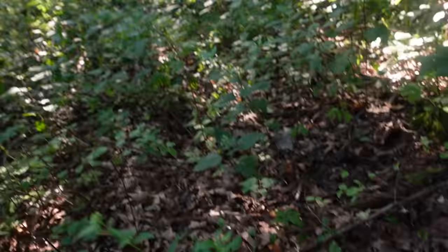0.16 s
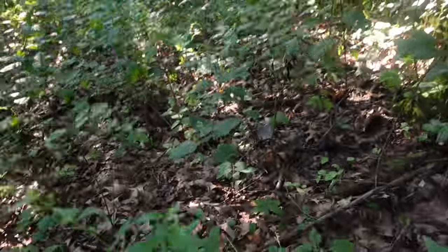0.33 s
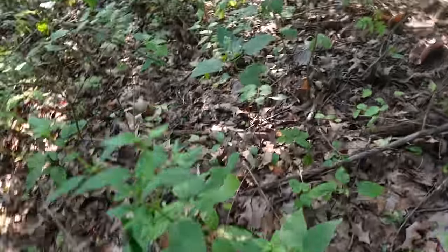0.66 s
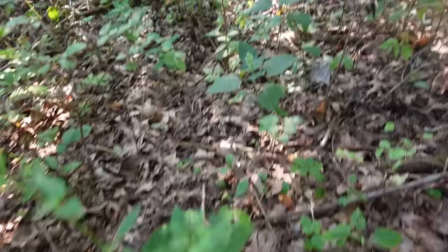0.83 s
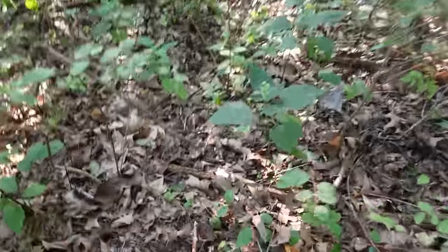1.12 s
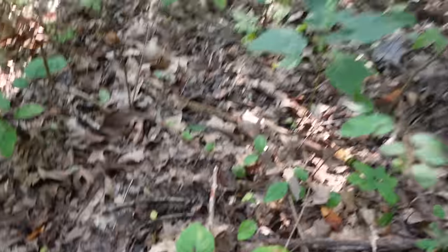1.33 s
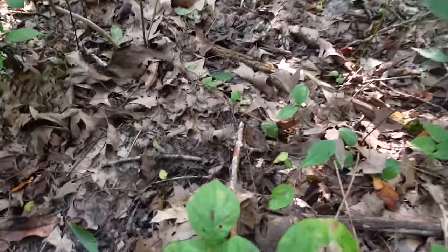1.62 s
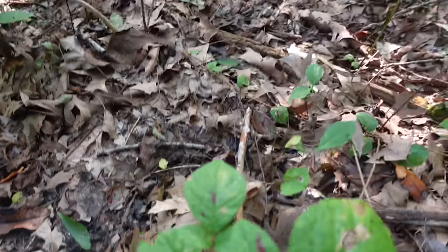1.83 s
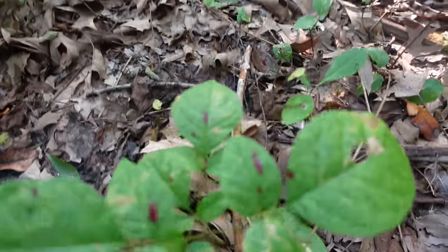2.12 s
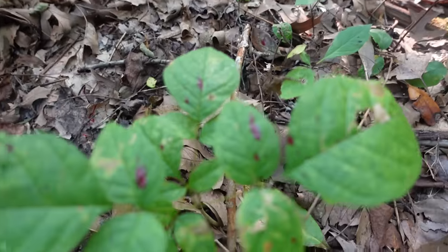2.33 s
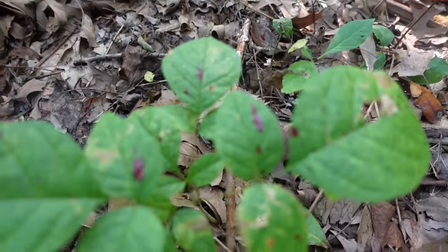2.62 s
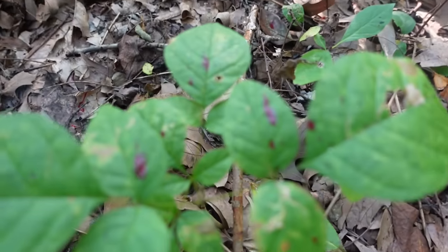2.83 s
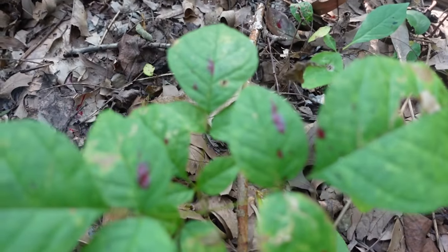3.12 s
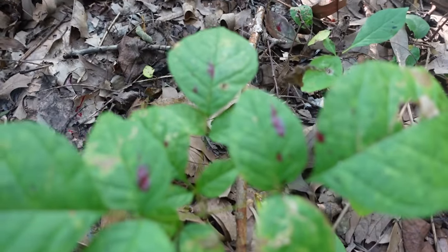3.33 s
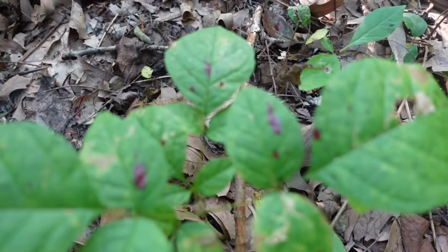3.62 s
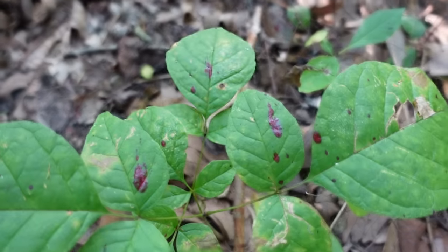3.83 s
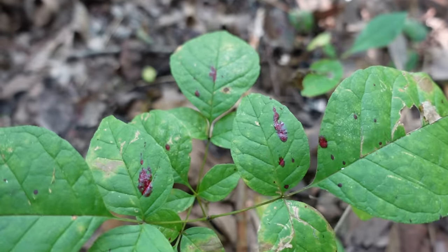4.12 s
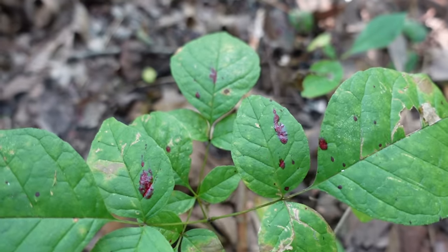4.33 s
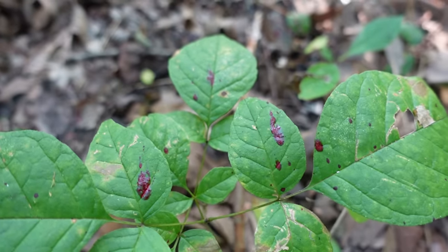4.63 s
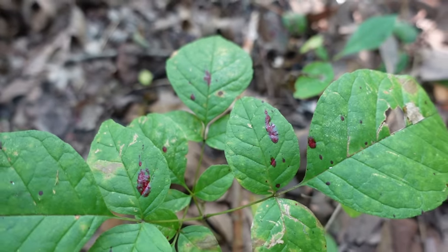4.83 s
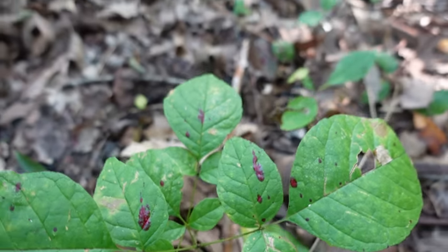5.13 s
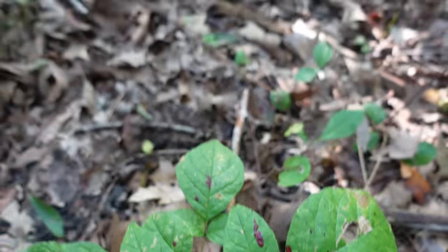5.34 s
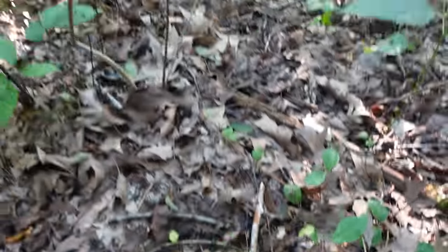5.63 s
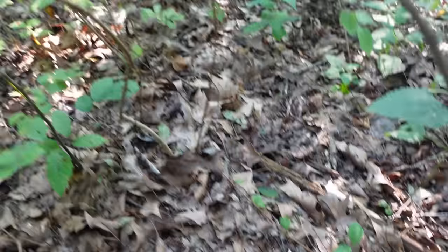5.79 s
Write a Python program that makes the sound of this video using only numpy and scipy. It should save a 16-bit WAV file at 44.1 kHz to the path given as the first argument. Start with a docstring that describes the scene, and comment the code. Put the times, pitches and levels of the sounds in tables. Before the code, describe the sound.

Distant cicadas fill summer woods with a steady, high drone for all six seconds, over a faint hiss of air. A nearby cricket adds a fast, thin, very high trill. From the start, feet stir dry leaves, with a twig snap just after the opening, while fingers make small plastic clicks, dull bumps and short low hums on the hand-held camera, slightly left. Between about 1.1 and 1.6 seconds a step crunches the litter and several twigs crack sharply, the loudest moment. Handling clicks and smaller snaps thin out by 3 seconds. Around 2.8 seconds the lens motor whines for a quarter of a second, left of centre. From 3 to 5 seconds the insects are nearly alone. Then come a few light clicks and very faint, low pips, and at about 5.8 seconds a soft swish of green leaves with a dry rustle underfoot.

```python
"""Far choirs of cicadas fill summer woods, their countless tymbal pulses blurring into two droning bands.
One cricket trills close by, a tone for each wing stroke. Feet shift in dry leaves and snap twigs.
Fingers make the plastic shell of a small hand-held camera click and hum; its lens motor whines once.
Near the end come a few soft pips and a swish of green leaves, all over a thin bed of air."""
import sys
import numpy as np
from scipy import signal
from scipy.fft import rfft, irfft, next_fast_len
from scipy.io import wavfile
from scipy.ndimage import uniform_filter1d, map_coordinates

SR = 44100
rng = np.random.default_rng(int(sys.argv[2]) if len(sys.argv) > 2 else 0)


def log_audio(samples):
    """Write samples as a 16-bit WAV file to the path given in sys.argv[1]."""
    # one column per channel
    frames = np.atleast_2d(samples).T
    # limit to full scale, then quantise
    limited = np.clip(frames, -1, 1)
    pcm = np.round(limited * 32767).astype(np.int16)
    wavfile.write(sys.argv[1], SR, pcm)


N = 262836

# Cicada faders, panned as the camera turns: (time [s], low choir [dB], high choir [dB], pan [dB])
CHOIR_FADERS = [(0, -44.5, -40, -1), (.8, -45.5, -40.5, -0.42), (1.3, -45, -41.5, -.8),
                (2, -45, -42.5, -0.04), (3.2, -45, -41.5, -.5), (4.3, -45.5, -42, -1),
                (5.2, -44.5, -42, -2), (5.96, -44, -41.5, -2.5)]
# Colour of each choir: (frequency [Hz], relative level [dB])
LOW_CHOIR_EQ = [(1060, -51), (1800, -27), (1950, -73.5), (2100, -24.5), (2380, -9.5), (2780, -5),
                (3430, -2.5), (3960, 1.5), (4270, 0), (4900, -7), (6370, -25), (10800, -120)]
HIGH_CHOIR_EQ = [(4100, -34), (4600, -10), (5400, -4), (6200, -0.5), (6900, 1), (7300, -3), (7800, -10),
                 (8500, -18.5), (9500, -29.5), (10500, -32.5)]
# Stereo image of choirs and air: (frequency [Hz], left-right likeness [-1..1])
WOODS_LIKENESS = [(60, 1), (130, 0.44), (290, -0.066), (640, -0.4), (1410, 0.063), (3100, 0.637),
                  (6820, 0.54), (15000, 0.42)]
# The cricket's wing tone: (time [s], level [dB])
TRILL_FADER = [(0, -55), (1, -47.5), (2, -49), (3, -49.5), (4, -50), (5, -53.5), (5.5, -48), (5.96, -45)]

# Leaf litter stirring: (time [s], rustle [dB], crackle [dB])
LITTER_FADERS = [(0, -62.5, -52), (.25, -60.5, -56), (.45, -54, -53.5), (.95, -55.5, -54.5),
                 (1.5, -52.5, -55.5), (1.85, -60.5, -56.5), (2.5, -64.5, -63.5), (3.6, -67, -70),
                 (4.5, -83.5, -74), (5.2, -73, -65), (5.42, -60.5, -56.5), (5.65, -71, -62.5),
                 (5.78, -66, -62), (5.96, -63, -69)]
# A shoe crushes the litter: (peak time [s], rustle [dB], crackle [dB], 20 dB fade [s])
SCUFFS = [(1.09, -51.5, -59, 0.2331), (1.245, -52, -57, .06), (1.29, -35.5, -45, 0.0769),
          (1.392, -40, -45.5, .07), (1.436, -39, -51, 0.0045), (1.489, -49, -49, 0.05),
          (1.58, -60, -58, 0.1062), (1.685, -54.5, -64, 0.24), (2.09, -64, -57.5, -0.01),
          (5.8, -50, -54, .04), (5.835, -45, -49, .05), (5.857, -48, -52, .03), (5.915, -57, -69, 0.24)]
# Colours of dry rustle, dry crackle and green leaves: (frequency [Hz], relative level [dB])
RUSTLE_EQ = [(100, -41.5), (200, -2.5), (500, -3.5), (1000, -1), (2000, 1.5), (4000, 2), (7000, -30)]
CRACKLE_EQ = [(3000, -45), (6000, 6), (9000, 2), (12000, -9.5), (14300, -10), (15700, -25), (16200, -34)]
SWISH_EQ = [(130, -28), (300, -5), (700, -6.5), (1600, -1), (3000, 4), (6000, -30.5), (11000, -19.5),
            (15600, -27.5)]
# Twigs and stiff leaves breaking: (time [s], body peak [dB], centre [Hz], treble peak [dB])
SNAPS = [(.130, -25.5, 3080, -53.5), (1.072, -41, 3800, -45), (1.098, -25, 3740, -56.5),
         (1.287, -18.5, 860, -44), (1.2887, -10, 4870, -38), (1.291, -18.5, 2940, -32.5),
         (1.306, -14.5, 4100, -36), (1.306, -14, 2280, -32.5), (1.308, -27, 820, -50),
         (1.394, -23, 3070, -35), (1.412, -27.5, 4200, -48), (1.4267, -14, 3250, -52),
         (1.432, -28, 3160, -52), (1.452, -42.5, 4000, -41), (1.47, -27.5, 3100, -39),
         (1.515, -50, 3800, -50), (1.524, -48, 3598, -51), (1.557, -28.5, 3000, -44.5),
         (1.569, -28.5, 3600, -49), (1.907, -34, 9000, -62), (2.1, -38, 3800, -50),
         (2.146, -24.5, 2630, -60), (2.272, -34, 2610, -53), (2.920, -23.5, 2305, -56)]
# Thin twigs die sooner: (centre [Hz], 60 dB decay [s])
SNAP_DECAY = [(800, 0.018), (2500, 0.011), (4500, 0.01)]

# Fingers slipping on the shell: (time [s], peak [dB], centre [Hz])
CLICKS = [(0.038, -50, 907), (0.131, -45, 1100), (.172, -39.5, 577), (.215, -43, 508), (.224, -51, 581),
          (.233, -39.5, 497), (.242, -46, 690), (.342, -40.5, 608), (.355, -42.5, 595), (0.398, -41.5, 810),
          (.486, -47, 1650), (.513, -43, 700), (.549, -43, 1630), (.558, -46, 600), (.577, -46, 600),
          (.603, -46, 810), (.672, -45, 800), (0.898, -48.5, 1270), (.986, -44, 800), (1.008, -37.5, 1094),
          (1.046, -49, 805), (1.139, -41, 808), (1.242, -33, 1430), (1.386, -31, 1440), (1.552, -38, 1900),
          (1.568, -43, 650), (1.59, -45.5, 1320), (1.636, -33.5, 1590), (1.668, -32, 1790),
          (1.702, -26, 1700), (1.739, -30, 1740), (1.787, -40, 1770), (1.888, -42.5, 644),
          (1.929, -33, 1470), (1.953, -42, 676), (2.066, -47, 1303), (2.096, -46.5, 1260),
          (2.139, -40.5, 1870), (2.186, -51, 1350), (2.274, -58.5, 1810), (2.437, -41, 2000),
          (2.565, -49, 1626), (2.736, -48, 1670), (2.756, -40.5, 1850), (2.906, -40.5, 2200),
          (2.933, -38.5, 1500), (3.465, -41, 1000), (4.543, -56, 1280), (4.733, -59, 1640),
          (5.309, -39, 1250), (5.344, -41.5, 1680), (5.369, -56, 1110), (5.492, -59.5, 600)]
# Dull clicks sit further left: (centre [Hz], pan [dB])
CLICK_PAN = [(600, 8.5), (1700, 2.5)]
# Resonances of the plastic: (frequency [Hz], width [Hz], gain [dB])
SHELL_MODES = [(394, 22.6, -3.5), (608, 90, -3), (860, 143, -11.5), (1187, 215, -0.5), (1778, 250, -11)]
# Squeezes of the hand: (start [s], length [s], hum [dB])
SQUEEZES = [(0.016, 0.072, -51.5), (0.072, 0.0605, -61), (0.127, 0.047, -52), (0.194, 0.0691, -37.5),
            (0.246, 0.092, -50.5), (.33, 0.16, -60.5), (0.515, .12, -60.5), (0.658, 0.058, -58),
            (.735, 0.045, -58), (0.998, 0.13, -62), (1.109, 0.094, -58), (1.23, 0.068, -61),
            (1.309, .07, -47.5), (1.627, 0.12, -48), (1.72, 0.11, -54), (1.863, 0.08, -54),
            (1.938, 0.072, -63), (2.06, 0.153, -72.5)]
# Pushes on the shell: (time [s], level [dB])
BUMPS = [(.027, -49), (.046, -56), (.174, -35), (.209, -35), (0.344, -35.5), (0.399, -45.5), (0.515, -47),
         (0.606, -53), (0.676, -57), (1.013, -54), (1.141, -54), (1.244, -57), (1.286, -30), (1.309, -30),
         (1.639, -40), (1.669, -61), (1.701, -37), (1.739, -38.5), (1.897, -50.5), (1.952, -41),
         (3.468, -62.5)]

# The focus motor's run: (time [s], gear rate [Hz], whine [dB])
MOTOR_RUN = [(2.752, 491, -50), (2.764, 493.6, -41), (2.777, 490, -39), (2.8, 590, -49.5),
             (2.83, 539, -51.5), (2.858, 468, -48), (2.92, 494.3, -46.5), (2.96, 496, -46.5),
             (2.977, 498, -39.5), (2.995, 492, -60)]
# Harmonics of the whine and of the low gear tone: (multiple of gear rate, relative level [dB])
WHINE_HARMONICS = [(7, 2.5), (8, -5)]
GEAR_HARMONICS = [(2, -26), (3, -16), (4, -11.5), (5, -9), (6, -14)]
# Colour of the motor's scrape: (frequency [Hz], relative level [dB])
SCRAPE_EQ = [(90, -22), (125, -11.5), (160, 1), (200, -3), (400, -6), (1500, -9), (3500, -1), (5000, -25.5)]

# Soft low pips: (time [s], pitch [Hz], level [dB], length [s])
PIPS = [(4.982, 745, -69, 0.047), (5.55, 670, -60.5, .018), (5.583, 675, -58, 0.017),
        (5.608, 686, -61.5, 0.025)]
# Colour of the air bed: (frequency [Hz], relative level [dB])
AIR_EQ = [(30, -25.5), (70, 1), (110, -1.5), (300, -1), (800, -1.5), (1500, -5.5), (2100, -4.5), (9000, 0),
          (12600, 1.5), (13800, -6.5), (14450, -4.5), (14650, -50)]


def cicadas(low_trim_db=1.2, high_trim_db=2.5, low_pan_db=-0.75):
    """Two kinds sing; so many tymbals at once merge into bands that swell a little."""
    low_db, high_db, pan = curves(CHOIR_FADERS)
    low = amp(low_db + low_trim_db + 0.17 * wobble(4.1)) * swarm(LOW_CHOIR_EQ, 1.5, 0.78)
    high = amp(high_db + high_trim_db + 0.1 * wobble(4.2)) * swarm(HIGH_CHOIR_EQ, 1.5, 0.57)
    return placed(low, pan + low_pan_db) + placed(high, pan)


def cricket(strokes_per_s=40.5, first_s=.0065, stroke_s=0.016, wing_hz=7190, sag_hz=170):
    """Each wing stroke is a short tone that sags in pitch, with a faint octave, and echoes among trunks."""
    t = np.arange(round(stroke_s * SR)) / SR
    tone, octave = np.zeros(N), np.zeros(N)
    for k in range(int(N / SR * strokes_per_s)):
        late_s, detune_hz, accent_db, start_phase = rng.standard_normal(4) * [.0006, 15.0, 2.6, 8.6]
        phase = start_phase + 2 * np.pi * ((wing_hz + detune_hz) * t - sag_hz * t * t / (2 * stroke_s))
        envelope = amp(accent_db) * np.sin(np.pi * t / stroke_s) ** 2.34
        start = max(first_s + k / strokes_per_s + late_s, 0)
        add(tone, start, envelope * np.sin(phase))
        add(octave, start, envelope ** 1.4 * np.sin(2 * phase))
    direct = amp(curves(TRILL_FADER)[0]) * unit(tone) + amp(-80.5) * unit(octave)
    trunks = rng.standard_normal((2, SR // 5)) * amp(-60 * np.arange(SR // 5) / SR / .15)
    echo = signal.fftconvolve(direct[None], trunks / np.linalg.norm(trunks[0]), axes=1)[:, :N]
    pan = curves(CHOIR_FADERS)[-1] + .3  # moves with the choirs
    return placed(direct + amp(-16) * echo, pan)


def dry_leaves(rise_share=0.54):
    """Leaf litter rustles and crackles in clumps under the feet, surging with each scuff."""
    rustle_gain, crackle_gain = amp(curves(LITTER_FADERS))
    for s, rustle_db, crackle_db, fade_s in SCUFFS:
        rustle_gain += swell(s, rustle_db, rise_share * fade_s, fade_s)
        crackle_gain += swell(s, crackle_db, rise_share * fade_s, fade_s)
    clumps = wobble(30)
    rustle = amp(0.28 * clumps + 0.32 * wobble(90)) * swarm(RUSTLE_EQ, 1.67, 3.0, [(300, 0.475)])
    crackle = amp(1.1 * clumps + 1.4 * wobble(90)) * swarm(CRACKLE_EQ, 1.54, 1.93, [(9000, 0.43)])
    return rustle_gain * unit(rustle) + crackle_gain * unit(crackle)


def twigs():
    """Each break is a sharp crack with a treble splinter that lasts twice as long."""
    out = np.zeros((2, N))
    for s, db, hz, treble_db in SNAPS:
        t60 = along(SNAP_DECAY, hz)
        body = burst(t60, lambda f: mode(f, hz, min(1.1 * hz, 4500)) ** 3, likeness=.75, rise_s=0.00039)
        splinter = burst(2 * t60, lambda f: mode(f, 11500, 6700) ** 3, likeness=0.49, rise_s=0.0014)
        add(out, s, amp(db) * body + amp(treble_db) * splinter)
    return out


def shell_clicks(t60=0.0115):
    """Fingertips slip on the plastic: soft strikers that ring its small modes."""
    def colour(f, hz):
        fingertip = mode(f, hz, 1.57 * hz) ** 2 / (1 + 1j * f / (3.4 * hz)) ** 2
        ring = sum((-1) ** k * amp(db) * mode(f, mode_hz, width)
                   for k, (mode_hz, width, db) in enumerate(SHELL_MODES))
        return fingertip * (0.412 + ring)

    out = np.zeros((2, N))
    for s, db, hz in CLICKS:
        click = burst(t60, lambda f: colour(f, hz), likeness=0.39, rise_s=0.002178)
        add(out, s, amp(db) * placed(click, along(CLICK_PAN, hz)))
    return out


def grip(hum_hz=228, bump_t60=0.074):
    """Squeezes make the shell's lowest mode hum and creak; pushes thump it and a shorter mode above."""
    pressure, t = np.zeros(N), np.arange(SR // 4) / SR
    for s, length, db in SQUEEZES:
        add(pressure, s, amp(db) * np.hanning(round(length * SR)) ** 0.714)
    flutter = amp(1.6 * wobble(39.3))
    hum = pressure * flutter * np.sin(2 * np.pi * np.cumsum(hum_hz + 14 * wobble(45)) / SR)
    for s, db in BUMPS:
        low_envelope = amp(db - 60 * t / bump_t60) * (1 - np.exp(-t / 0.0014)) ** 2
        high_envelope = amp(db - 8 - 150 * t / bump_t60) * (1 - np.exp(-t / 0.00079))
        add(hum, s, low_envelope * np.sin(2 * np.pi * rng.normal(234, 7.0) * t))
        add(hum, s, high_envelope * np.sin(2 * np.pi * rng.normal(409, 20) * t))
    friction = rng.standard_normal(N) + .4 * rng.standard_normal((2, N))
    creak = unit(filtered(friction, lambda f: mode(f, 246, 262) ** 2))
    return placed(hum, -3.5) + 0.5 * pressure * creak


def lens_motor(running_roughness=0.12, settle_s=.034, brake_s=0.027):
    """Gear harmonics whine over a fading scrape, left of centre, and chatter at the start and stop."""
    hz, whine_db = curves(MOTOR_RUN)
    t = np.arange(N) / SR
    since, until = t - MOTOR_RUN[0][0], MOTOR_RUN[-1][0] - t
    gate = np.clip(np.minimum(since, until) / 0.003, 0, 1)
    judder = np.exp(-(since / settle_s) ** 2) + np.exp(-(until / brake_s) ** 2)
    rough = np.clip(running_roughness + judder, 0, 1)
    phase = 2 * np.pi * np.cumsum(hz * (1 + 0.00168 * wobble(150))) / SR

    def harmonics(table):
        return sum(amp(db + 2.7 * wobble(120)) * np.sin(k * phase) for k, db in table)

    loose_teeth = amp(1.8 * wobble(250)) * rng.standard_normal(N)
    chatter = unit(filtered(loose_teeth, lambda f: mode(f, 3470, 600) ** 2))  # the housing rings
    scrape = amp(-52 - 12 * np.abs(since)) * swarm(SCRAPE_EQ, 1.5, 3.2, [(300, 0.39)])
    whine = np.sqrt(2 - 2 * rough) * harmonics(WHINE_HARMONICS) + np.sqrt(rough) * chatter
    gears = amp(-47) * np.sqrt(1 - rough) * harmonics(GEAR_HARMONICS)
    return gate * placed(amp(whine_db) * whine + gears + scrape, 5.6)


def green_leaves():
    """Green leaves sweep past in one soft swish."""
    swish = unit(amp(2.7 * wobble(70)) * swarm(SWISH_EQ, 2.1, 2.5, [(1000, 0.8)]))
    return swell(s=5.838, db=-43, rise_s=.06, fade_s=.05) * swish


def pips(width_hz=210):
    """Short puffs of narrow noise make soft, fuzzy low pips."""
    out = np.zeros((2, N))
    for s, hz, db, length in PIPS:
        noise = rng.standard_normal((2, round(length * SR)))
        fuzz = filtered(noise, lambda f: mode(f, hz, width_hz) ** 2)
        add(out, s, amp(db) * unit(fuzz) * np.hanning(fuzz.shape[1]) ** 0.16)
    return out


def air():
    """A faint, wide hiss lies under everything."""
    return amp(-62.5) * swarm(AIR_EQ, spiky_db=0.74, patchy_db=1.0)


def swarm(eq, spiky_db, patchy_db, likeness=WOODS_LIKENESS):
    """Countless tiny pulses of scattered size, in stereo, coloured and in patches; rms 1."""
    pulses = rng.standard_normal((2, N)) * amp(spiky_db * rng.exponential(size=N))
    spectra = signal.stft(pulses, nperseg=512)[2]
    patches = uniform_filter1d(rng.standard_normal(spectra.shape[1:]), size=6, axis=0)
    patches = uniform_filter1d(patches, size=10, axis=1)
    pair = signal.istft(spectra * amp(patchy_db * unit(patches)), nperseg=512)[1][:, :N]
    closed_eq = [(1, -120), *eq, (eq[-1][0] * 1.05, -120)]

    def colour(hz):
        spread = np.arccos(np.clip(along(likeness, hz), -1, 1)) / 2
        return amp(along(closed_eq, hz)) * [np.cos(spread), np.sin(spread)]

    mid, side = filtered(pair, colour)
    return unit(np.array([mid + side, mid - side]))


def burst(t60, response, likeness, rise_s):
    """Fuzz swells to a sharp break and dies, through a resonance; stereo, its mid peaking at 1."""
    t = np.arange(2048) / SR - rise_s
    envelope = amp(np.where(t < 0, 20 * t / rise_s, -60 * t / t60)) / np.sqrt(t60 * SR / 14)
    fuzz = rng.standard_normal((2, len(t))) * envelope
    spike = [[1.1], [0]] * (np.abs(t) == np.abs(t).min())
    mid, side = filtered(fuzz + spike, response)
    side *= 1 - likeness
    return np.array([mid + side, mid - side]) / np.abs(mid).max()


def swell(s, db, rise_s, fade_s):
    """A gain that peaks at s seconds, moving 20 dB per rise or fade time."""
    late = np.arange(N) / SR - s
    return amp(db - 20 * np.maximum(late / fade_s, -late / rise_s))


def wobble(rate):
    """A smooth random curve, rate knots a second."""
    return map_coordinates(rng.standard_normal(int(N * rate / SR) + 4), [np.arange(N) * rate / SR])


def curves(rows):
    """One value per sample for each column after the time."""
    times, *columns = np.transpose(rows)
    return [np.interp(np.arange(N) / SR, times, column) for column in columns]


def along(points, hz):
    """Read (frequency, value) points on a log axis."""
    f, values = np.transpose(points)
    return np.interp(np.log(hz + 1), np.log(f + 1), values)


def filtered(x, response):
    """Pass x through a complex frequency response."""
    size = next_fast_len(x.shape[-1] + SR // 4)
    return irfft(rfft(x, size) * response(np.fft.rfftfreq(size, 1 / SR)), size)[..., :x.shape[-1]]


def mode(f, hz, width):
    """One causal resonance."""
    return 1j * f * width / (hz * hz - f * f + 1j * f * width)


def placed(x, pan_db):
    """Pan x; positive is left."""
    return x * amp([pan_db / 2, -pan_db / 2]).reshape(2, -1)


def add(bus, s, x):
    """Mix x into the bus at s seconds."""
    part = bus[..., round(s * SR):][..., :x.shape[-1]]
    part += x[..., :part.shape[-1]]


def amp(db):
    return 10 ** (np.asarray(db) / 20)


def unit(x):
    return x / np.sqrt(np.mean(x ** 2) + 1e-20)


def scene():
    """Footwork and handling sit in front of the insects and air."""
    woods = air() + cicadas() + cricket()
    foliage = dry_leaves() + twigs() + green_leaves()
    handling = shell_clicks() + grip() + lens_motor()
    return woods + foliage + handling + pips()


def record(dry):
    """The camera rolls off the bass below 60 Hz and keeps nothing above 16.4 kHz."""
    return filtered(dry, lambda hz: (hz < 16400) * (1j * hz / (60 + 1j * hz)) ** 3)


dry = scene()
out = record(dry)
log_audio(out)
```